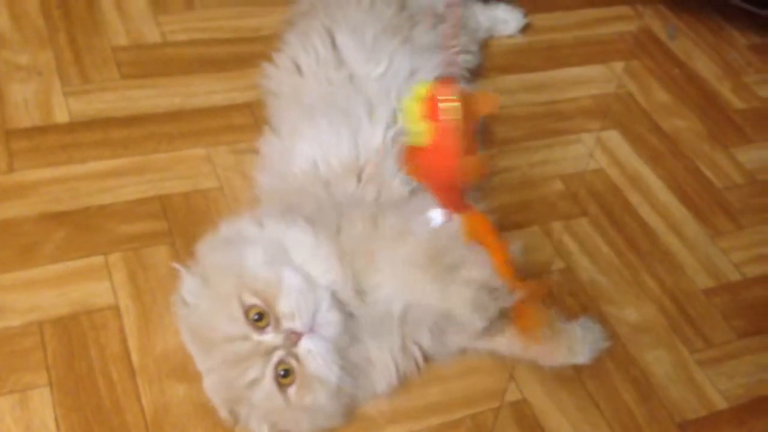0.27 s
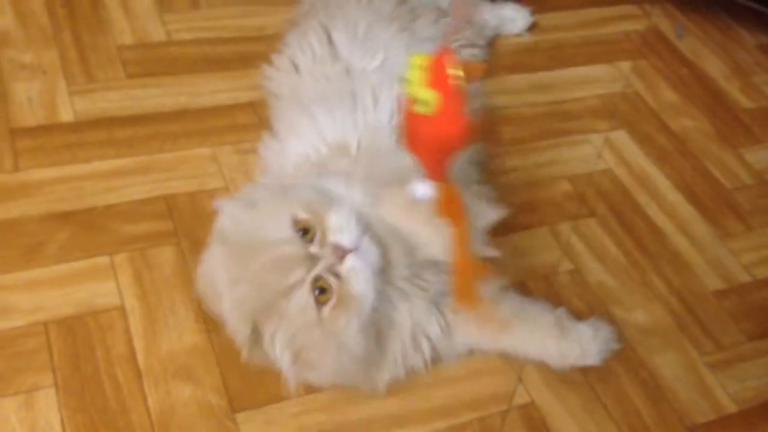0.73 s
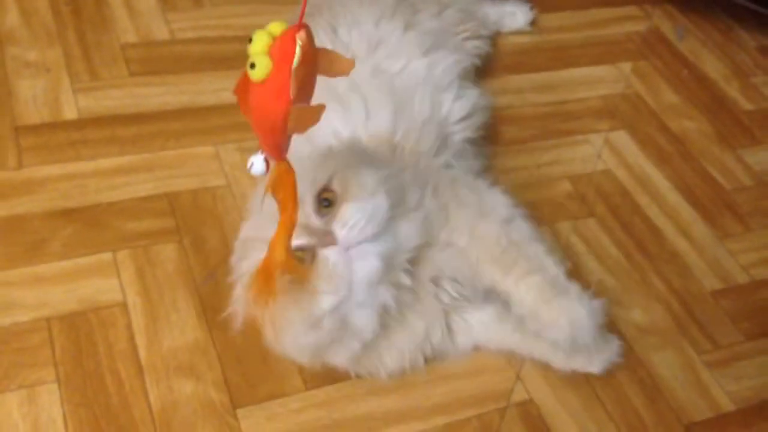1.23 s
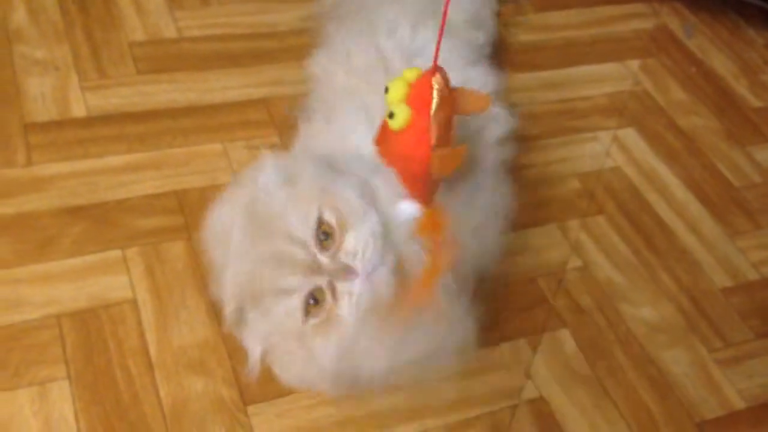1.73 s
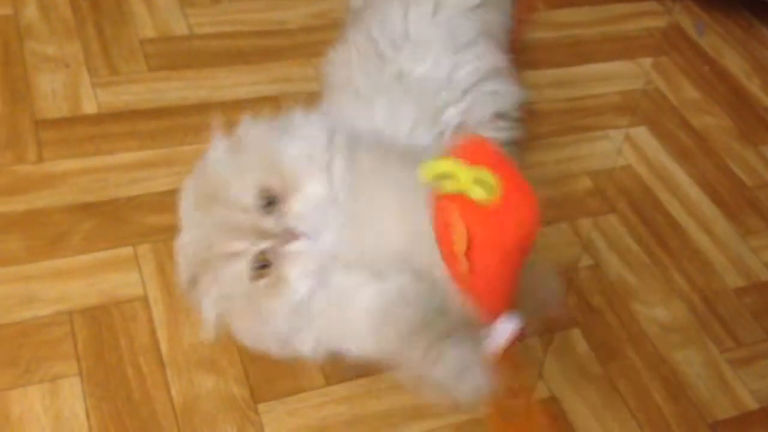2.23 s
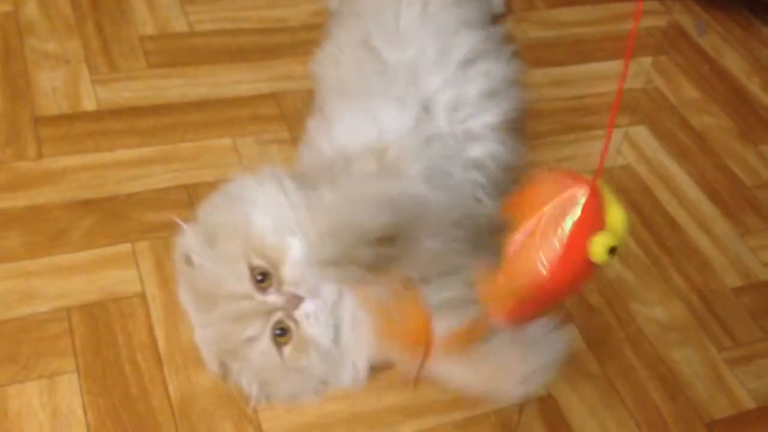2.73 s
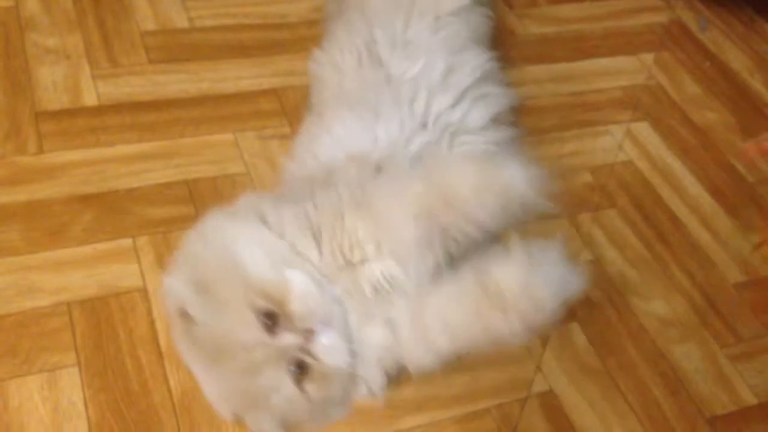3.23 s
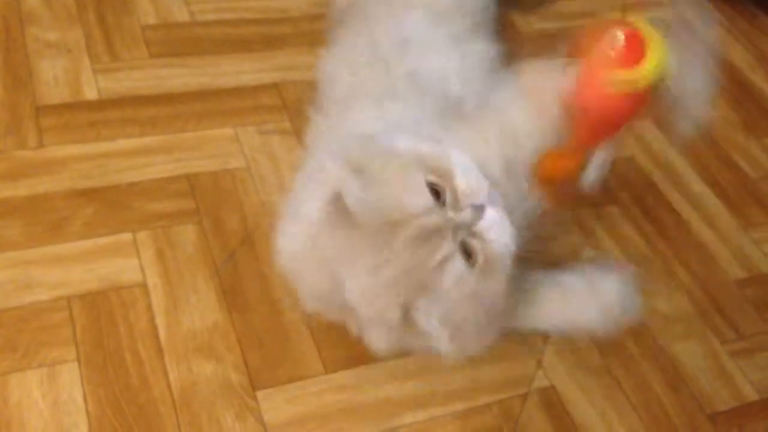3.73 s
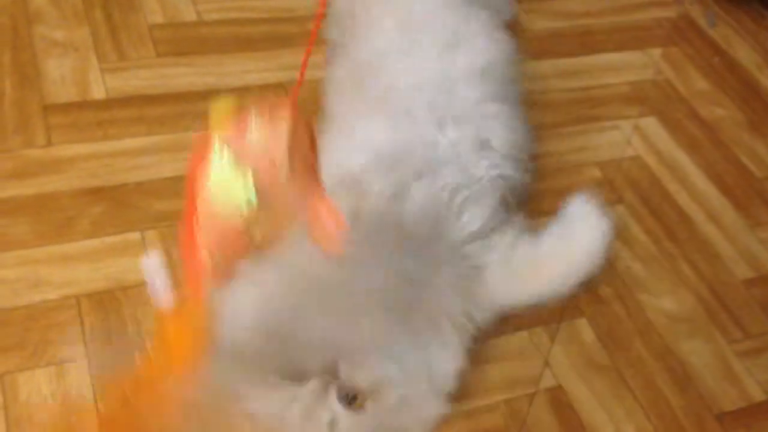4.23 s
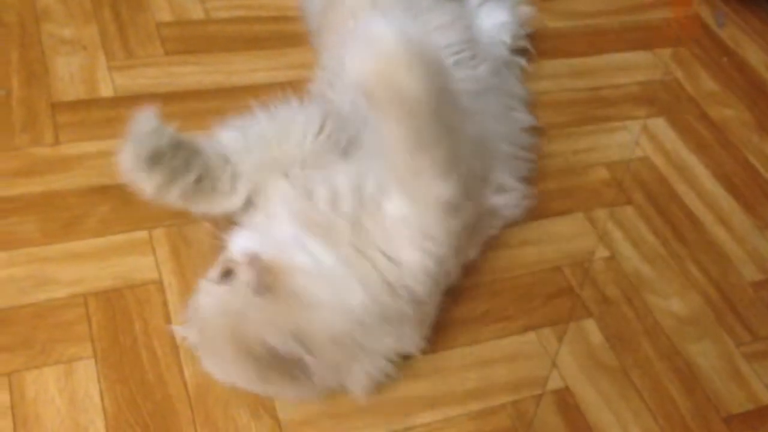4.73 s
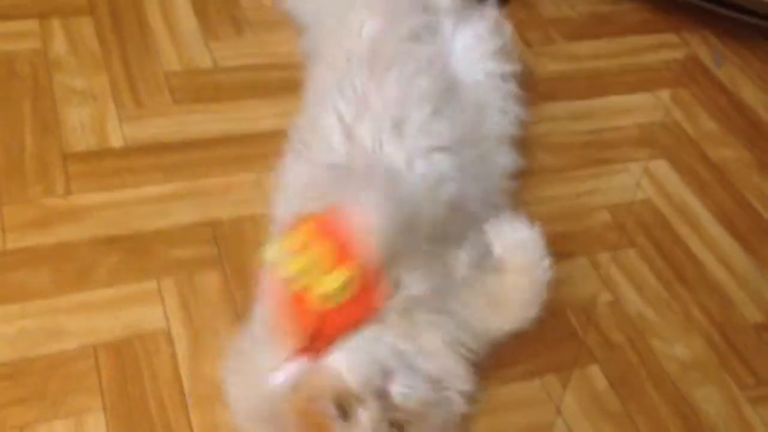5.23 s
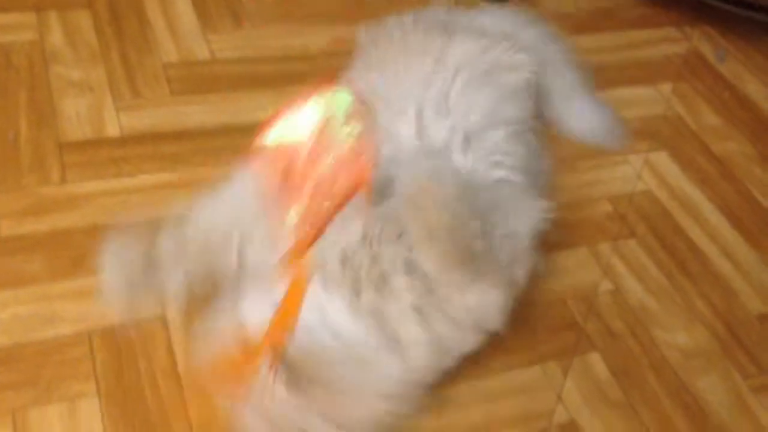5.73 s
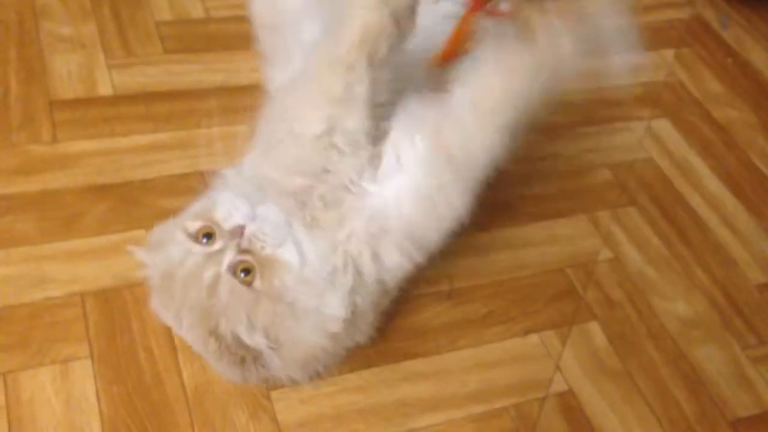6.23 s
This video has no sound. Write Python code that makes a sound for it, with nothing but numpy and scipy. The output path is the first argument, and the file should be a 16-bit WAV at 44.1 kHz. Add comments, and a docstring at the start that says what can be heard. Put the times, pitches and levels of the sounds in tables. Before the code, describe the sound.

A quiet small room with steady soft microphone hiss and a faint low hum. From 0 to 1.4 s there are only light air whisks, a soft body slide near 0.4 and small dull taps at about 0.5, 0.7 and 1.2. At 1.45 claws catch the hollow toy with a short scratch and a sharp bright click. Faint ticks from 1.8 grow into a loud, very high, dry bell jingle at 2.1, rattling until about 2.3, with smaller clusters at 2.6 to 2.7. Another dense jingle comes at 3.15 to 3.3, then a bright burst at 3.8. A firm low wooden thump lands at 3.93, with scuffs, swishes and weaker thuds to 4.3. The bell jingles again at 4.43 to 4.75, a dull knock follows at 4.9, and a short tinkle at 5.27. Soft fur swishes lead to tiny taps, a light thud and slide near 6.25, and a last faint tinkle at 6.4.

```python
"""A tiny slotted bell jingles in clusters while paws scratch, tap and thump on a parquet floor and fur swishes;
microphone hiss lies over a low room hum. A kitten bats at a dangling toy close to a camera in a quiet room.
The bell is decaying shell modes with dry ticks, and dense random contacts as its pellet rolls.
Scratches, rasps and swishes are grainy noise in bands, taps short noise bursts, thumps damped board modes.
Sparse reflections carry all but the thumps, hiss and hum into the room."""
import sys
import numpy as np
from scipy import signal
from scipy.fft import rfft, irfft
from scipy.io import wavfile

SR = 44100
rng = np.random.default_rng(int(sys.argv[2]) if len(sys.argv) > 2 else 0)


def put_to_file(sound):
    """Save the sound as 16-bit audio at rate SR, in the file named by the first command-line argument."""
    columns = np.atleast_2d(sound).T  # one column per channel
    safe = np.clip(columns, -1, 1)
    whole_steps = np.round(safe * 32767)
    wavfile.write(sys.argv[1], SR, whole_steps.astype(np.int16))


def magnitude_from_level(level_db):
    """Linear magnitude for a level in decibels (20 dB per decade)."""
    exponent = np.asarray(level_db, float) / 20
    return 10 ** exponent


N = 285327  # length in samples


def evened(x):
    """Normalisation of power: scales to rms 1."""
    return x / np.sqrt(np.mean(x ** 2) + 1e-20)


def read(points, hz):
    """Interpolation along a logarithmic frequency axis, between the points of a table."""
    f, value = np.transpose(points)
    return np.interp(np.log(hz + 1), np.log(f + 1), value)


def add(mix, s, sound):
    """Superposition: adds a sound to the mix in place, from time s."""
    part = mix[round(s * SR):][:len(sound)]
    part += sound[:len(part)]


def fade(t, t60):
    """Exponential decay: falls 60 dB in t60 seconds."""
    return magnitude_from_level(-60 * t / t60)


def band(x, hz, width_hz):
    """Resonant filtering: a bell-shaped band around hz, thinned far below it, at rms 1."""
    f = np.fft.rfftfreq(len(x), 1 / SR)
    thin_below = f ** 2 / (f ** 2 + (0.15 * hz) ** 2)
    bell_shape = 1 / (1 + ((f - hz) / (width_hz / 2)) ** 2)
    return evened(irfft(rfft(x) * thin_below * bell_shape, len(x)))


def background():
    """Stationary noise: smooth microphone hiss, and narrow noise bands heard as wavering drones of the house."""
    # hiss spectrum, relative: hz, density_db (per Hz)
    hiss_colour = [(12, -63), (20, -44), (38, -8.5), (112, -1.5), (189, -4.5), (218, -8), (295, -12),
                   (401, -15), (544, -13), (974, -19.5), (1180, -19.5), (2120, -21), (4120, -20),
                   (15200, -23)]
    # drones: centre_hz, width_hz, level_db
    drones = [(53.4, 10, -76.5), (117, 33, -82), (190.2, 11, -80.5), (284.5, 24, -82), (515.4, 68, -78)]
    f = np.fft.rfftfreq(N, 1 / SR)
    coloured = irfft(rfft(rng.standard_normal(N)) * magnitude_from_level(read(hiss_colour, f)), N)
    out = magnitude_from_level(-64) * evened(coloured)
    for hz, width_hz, db in drones:
        out += magnitude_from_level(db) * band(rng.standard_normal(N), hz, width_hz)
    return out


def room(x):
    """Reverberation: sparse reflections of random sign, each frequency band decaying at its own rate."""
    # decay of the room: hz, t60_s
    room_decay = [(300, 0.55), (2000, 0.27), (8000, 0.26), (15000, 0.074)]
    reverb_db, spacing = -12, 20  # spacing in samples
    hits = np.zeros(SR // 2)
    slots = np.arange(160, len(hits) - spacing, spacing)
    hits[slots + rng.integers(0, spacing, len(slots))] = rng.choice([-1., 1.], len(slots))
    hz, t, spectrum = signal.stft(hits, SR, nperseg=256)
    decay = fade(t, read(room_decay, hz)[:, None])
    tail = signal.istft(spectrum * decay, SR, nperseg=256)[1]
    return magnitude_from_level(reverb_db) * signal.fftconvolve(x, tail / np.linalg.norm(tail))[:N]


def thumps():
    """Modal excitation: a soft push rings the low modes of the boards until the weight settles on them."""
    # body and paws landing: start_s, level_db, pitch_factor, choke_s (time until the weight damps the ring)
    landings = [(3.932, -18.5, 0.96, 0.032), (3.978, -34.5, 0.94, 0.026), (4.021, -47, .9, 0.092),
                (4.081, -44.5, 0.886, 0.047), (4.272, -41, 0.78, 0.023), (4.312, -41.5, 0.46, 0.072),
                (6.23, -46, 0.7, 0.033), (6.254, -40.5, 0.39, 0.035)]
    # board modes before the pitch factor: mode_hz, relative_db, t60_s
    board_modes = [(191, 0, 0.14), (308, -10.5, 0.056), (436, -18, 0.053), (674, -36.5, 0.052)]
    rise_s, choke_t60_s = 0.0047, 0.03
    out, t = np.zeros(N), np.arange(8192) / SR
    bent = t + 0.0015 * (1 - np.exp(-t / 0.0023))  # the loaded board starts stiffer, so the pitch sags
    push = np.sin(np.pi / 2 * np.minimum(t / rise_s, 1)) ** 2
    for s, db, pitch, choke in landings:
        ring = np.zeros(len(t))
        for hz, mode_db, t60 in board_modes:
            ring += magnitude_from_level(mode_db) * np.sin(2 * np.pi * hz * pitch * bent) * fade(t, t60)
        choked = fade(np.maximum(t - choke, 0), choke_t60_s)
        add(out, s, -magnitude_from_level(db) * ring * push * choked)
    # boards radiate little deep bass
    return signal.sosfilt(signal.butter(3, 120, "high", fs=SR, output="sos"), out)


def grainy_strokes(table, edge, grain_db, colour=None):
    """Amplitude-modulated noise: grains of uneven size under a stroke, in the row's band or a shared colour."""
    out, size = np.zeros(N), (len(table), SR // 2)
    grains = rng.standard_normal(size) * magnitude_from_level(grain_db * np.minimum(rng.exponential(1, size), 4))
    for (s, length, db, *own), grain in zip(table, grains):
        stroke = signal.windows.tukey(round(length * SR), edge)  # edge: share of the stroke spent fading
        heard = np.zeros(len(grain))
        for hz, width_hz, part_db in colour or [(*own, 0)]:
            heard += magnitude_from_level(part_db) * band(grain, hz, width_hz)
        add(out, s, magnitude_from_level(db) * evened(heard[:len(stroke)]) * stroke)
    return out


def whisks():
    """Broadband air noise: the toy's tail whisks through the air."""
    # strokes: start_s, length_s, level_db
    tail_strokes = [(0, 0.05, -64.5), (.85, 0.15, -64)]
    # their colour: centre_hz, width_hz, relative_db
    air_colour = [(3380, 5700, 1.5), (10150, 640, -5), (10200, 4000, -6.5)]
    return grainy_strokes(tail_strokes, edge=0.33, grain_db=4.0, colour=air_colour)


def slides():
    """Sliding friction: the body drags over the boards, heard through three shared bands."""
    # strokes: start_s, length_s, level_db
    body_strokes = [(.42, 0.22, -63), (6.27, 0.079, -65)]
    # their colour: centre_hz, width_hz, relative_db
    slide_colour = [(330, 120, -3), (605, 310, -1.5), (1800, 1500, -2)]
    return grainy_strokes(body_strokes, edge=0.53, grain_db=5, colour=slide_colour)


def swishes():
    """Soft band noise with long fades: fur and cloth brushing past, and a 6.5 kHz hiss under the bell's jingling."""
    # soft noises: start_s, length_s, level_db, centre_hz, width_hz
    soft_noises = [(.25, 0.29, -68, 186, 199), (0.55, 0.16, -69, 12900, 4000),
                   (3.93, 0.17, -67, 3700, 8700), (3.98, 0.055, -63.5, 1040, 600),
                   (4.205, 0.038, -68, 1230, 440), (4.105, 0.021, -63.5, 1080, 660),
                   (4.8, .07, -73.5, 750, 140), (3.95, 0.046, -53.5, 314, 130),
                   (3.98, 0.064, -63.5, 11800, 5000), (4.1, 0.041, -60, 5100, 7600),
                   (4.205, 0.04, -57, 6800, 5200), (4.55, 0.14, -67, 185, 88),
                   (4.86, .13, -64.5, 6700, 11000), (5.55, 0.45, -72, 8300, 8700),
                   (5.875, 0.045, -70, 2050, 400), (5.995, 0.028, -70, 1760, 560),
                   (5.98, 0.13, -63, 12400, 7800), (6, 0.16, -66, 8900, 8300),
                   (3.15, 0.11, -57, 6540, 4000)]
    return grainy_strokes(soft_noises, edge=0.49, grain_db=3.5)


def scratches():
    """Rough, short grainy bursts: friction of claw drags, and a 6.3 kHz rasp within the bell's jingle."""
    # bursts: start_s, length_s, level_db, centre_hz, width_hz
    rough_bursts = [(1.464, .016, -62, 2200, 900), (1.482, 0.042, -69, 9700, 6060),
                    (2.075, 0.022, -48, 6100, 5000), (4.002, 0.012, -55.5, 2520, 2000),
                    (4.013, 0.0097, -55.5, 3500, 5000), (4.028, 0.0061, -58.5, 3000, 4000),
                    (3.804, 0.0074, -48, 6300, 1200)]
    return grainy_strokes(rough_bursts, edge=0.079, grain_db=7.0)


def catches():
    """Cavity resonance: claws catch the hollow toy, and their friction is heard through its resonances."""
    # strokes: start_s, length_s, level_db
    claw_catches = [(1.442, .022, -50.5), (2.075, 0.0194, -52)]
    # resonances of the toy: centre_hz, width_hz, relative_db
    toy_colour = [(610, 280, -9.5), (1013, 170, -4), (1483, 120, -0.5), (2220, 340, 0.5), (3800, 1800, -2)]
    return grainy_strokes(claw_catches, edge=0.069, grain_db=1.5, colour=toy_colour)


def taps():
    """Impact noise: claw and toy taps are short dull clicks, noise bands that decay without a ring."""
    # taps: start_s, level_db (at the onset), centre_hz, width_hz, t60_s
    tap_rows = [(3.797, -49.5, 4000, 6000, .005), (0.48, -58, 3000, 3000, 0.0088),
                (.546, -46.5, 2500, 3020, 0.0089), (0.723, -54, 1990, 5000, 0.017),
                (1.2, -54, 1490, 2500, 0.014), (1.4813, -30.5, 10800, 5000, 0.0052),
                (1.798, -51, 1800, 2960, 0.023), (1.799, -46, 11900, 5000, 0.0067),
                (2.075, -36.5, 5300, 6140, 0.021), (3.147, -50, 4040, 5000, .006),
                (4.047, -54, 3000, 4000, 0.0083), (4.069, -54, 2400, 3000, 0.012),
                (4.075, -54, 2950, 5000, 0.0086), (4.09, -48.5, 2360, 3000, 0.0087),
                (6.155, -57, 2500, 3000, .008), (6.297, -57, 2500, 3000, .01), (6.31, -58, 2500, 3000, .01),
                (4.915, -49, 586, 696, 0.031), (1.4813, -43.5, 3000, 5000, 0.0091)]
    out, t = np.zeros(N), np.arange(1024) / SR
    for s, db, hz, width_hz, t60 in tap_rows:
        noise = rng.standard_normal(len(t))
        add(out, s, magnitude_from_level(db) * band(noise, hz, width_hz) * fade(t, t60))
    return out


def strikes(table):
    """Modal synthesis: each contact excites three rings of shell modes and a dry tick that bounces once."""
    # shell modes in three clusters, the low, middle and top ring; each: mode_hz, relative_db, t60_s (early decay)
    shell_rings = [
        [(12130, 0, .013), (11780, -11, .009), (12450, -12, .011)],
        [(13350, 0, .013), (13740, -11, .011), (12950, -13, .011)],
        [(14800, 0, .011), (14350, -8, .01), (15100, -8, .01)],
    ]
    # colour of the tick, with the air in the shell near 6.5 kHz: hz, relative_db
    tick_colour = [(500, -50), (1500, -18.5), (2500, -9.5), (4000, -4), (5800, -3), (6500, 2.5),
                   (7200, -1.5), (11000, -2.5), (16000, -1.5), (20000, -42)]
    after_db, after_t60_s = -25, 0.055  # what sings on once the pellet lets go
    bounce_s, bounce_db = 0.0014, -1.5  # mean delay, and middle level relative to the tick
    t, lead = np.arange(4096) / SR, 64  # lead: samples of room ahead of the contact
    colour = magnitude_from_level(read(tick_colour, np.fft.rfftfreq(len(t), 1 / SR)))
    place = rng.standard_normal((len(table), 3, 3, 2))
    bounce, grit = rng.standard_normal((len(table), 2)), rng.standard_normal((len(table), len(t)))
    for (*ring_db, tick_db), p, b, g in zip(table, place, bounce, grit):
        ring = np.zeros(len(t))
        for db, modes, chance in zip(ring_db, shell_rings, p):
            for k, ((hz, mode_db, t60), (detune, share)) in enumerate(zip(modes, chance)):
                decay = fade(t, t60) + magnitude_from_level(after_db) * fade(t, after_t60_s)
                weight = magnitude_from_level(db + mode_db) * (share if k else 1)  # where it lands sets the side modes
                ring += weight * np.sin(2 * np.pi * hz * (1 + 0.0034 * detune) * t) * decay
        ring *= 1 - np.exp(-t / 0.00018)  # soft onset
        contact = (t == 0) + g * (0.36 * fade(t, 0.0014) + 0.065 * fade(t, 0.06))
        tick = irfft(rfft(np.roll(contact, lead)) * colour, len(t))
        tick *= magnitude_from_level(tick_db) / abs(tick).max()
        delay = round(SR * bounce_s * (1 + 0.15 * b[0]))
        again = np.roll(tick, delay) * magnitude_from_level(bounce_db + 3.9 * b[1])
        yield np.roll(np.roll(ring, lead) + tick + again, -lead)[:-lead]


def clear_strikes():
    """Isolated impacts: the pellet strikes the shell in clusters, each with its own balance of rings and tick."""
    # strikes: start_s, low_ring_db, middle_ring_db, tick_db (peak)
    strike_rows = [(0.7613, -59, -54, -75), (1.8339, -51, -60, -46.5), (1.8529, -52, -71, -48),
                   (1.9086, -60, -40, -34.5), (1.921, -50, -51, -38), (1.93, -42, -53, -36),
                   (1.942, -39, -31, -37), (2.024, -50, -57, -46), (2.036, -46, -57, -43),
                   (2.0957, -23.5, -25, -26), (2.0967, -29, -30, -26), (2.104, -26, -39, -41),
                   (2.113, -24.5, -29, -31.5), (2.1327, -40, -41, -41), (2.1488, -32, -39, -30.5),
                   (2.166, -35, -39, -37), (2.181, -29.5, -33, -32), (2.208, -38, -51, -37),
                   (2.226, -44, -57, -35), (2.247, -54, -49, -48), (2.2613, -29.5, -32, -38),
                   (2.2708, -39, -60, -41), (2.2804, -53, -62, -39.5), (2.463, -53, -62, -48.5),
                   (2.559, -60, -65, -48), (2.5919, -47, -59, -38), (2.5975, -58, -41, -36),
                   (2.6048, -60, -48, -33.5), (2.651, -39, -50, -35), (2.6572, -55, -40, -37.5),
                   (2.662, -35, -42, -38.5), (2.668, -45, -57, -36), (2.701, -26.5, -20.5, -32),
                   (2.71, -46, -60, -38), (3.1592, -53, -49, -43), (3.1722, -54, -60, -32.5),
                   (3.1752, -49, -41, -43), (3.18, -43, -46, -35), (3.208, -43, -46, -32),
                   (3.22, -25, -42, -32), (3.2342, -30, -43, -30), (3.2524, -35, -40, -43),
                   (3.26, -33, -45, -40), (3.2925, -57, -64, -47), (3.415, -41, -53, -39.5),
                   (3.423, -45, -51, -47), (3.6059, -57, -71, -65), (3.8015, -32, -54, -32.5),
                   (3.8165, -55, -46, -42), (3.831, -26, -40, -33), (3.8365, -29, -24, -36),
                   (3.8411, -25, -60, -29.5), (4.4256, -38, -26, -30.5), (4.437, -32, -54, -35),
                   (4.4417, -42, -49, -33.5), (4.459, -18.5, -41, -29.5), (4.4766, -32, -42, -36),
                   (4.4817, -60, -38, -35), (4.506, -56, -47, -36.5), (4.5278, -53, -58, -44),
                   (4.538, -62, -46, -42), (4.56, -52, -66, -48), (4.5698, -57, -70, -50),
                   (4.6429, -56, -70, -60), (4.6853, -41, -52, -44), (4.6937, -39, -57, -48),
                   (4.7206, -43, -60, -56), (4.7288, -46, -53, -46), (5.015, -57, -65, -44.5),
                   (5.2504, -47, -70, -49), (5.2718, -29, -56, -36), (5.2846, -36, -70, -42),
                   (5.3, -43, -66, -43), (5.6407, -57, -69, -47.5), (6.187, -55, -59, -45),
                   (6.207, -52, -63, -45), (6.412, -38, -51, -36), (6.43, -53, -55, -42)]
    top_ring_db = -21  # relative to the stronger of the other two rings
    out = np.zeros(N)
    levels = [(low, middle, max(low, middle) + top_ring_db, tick) for _, low, middle, tick in strike_rows]
    for (s, *_), sound in zip(strike_rows, strikes(levels)):
        add(out, s, sound)
    return out


def rolling():
    """Shot noise: a shower of tiny random contacts as the pellet rolls round the shell after a jolt."""
    # rolls: start_s, build_up_s, level_db (the peak rms comes out 1.2 dB above it), t60_s
    roll_rows = [(1.9, .03, -53.5, 0.3), (2.095, .003, -52, 0.23), (2.15, 0.036, -49.5, 0.21),
                 (2.26, .01, -59, 0.13), (2.592, .002, -54, 0.13), (2.65, 0.015, -53, 0.065),
                 (2.7, .005, -56, 0.11), (3.15, 0.033, -48.5, 0.29), (3.2, 0.047, -47.5, 0.12),
                 (3.403, .006, -60, .2), (3.8, .003, -54, .12), (3.825, 0.012, -43, 0.13),
                 (4.425, .005, -55, 0.34), (4.455, .012, -50, 0.23), (4.685, .003, -48, 0.041),
                 (4.715, 0.0084, -55.5, 0.092), (5.272, .003, -53, 0.13), (6.41, .003, -59, 0.21)]
    # balance of one contact, relative: low_ring_db, middle_ring_db, top_ring_db, tick_db
    roll_mix = [0, -3, -17, -5]
    contacts_per_s = 1100
    kinds = list(strikes([roll_mix] * 8))  # eight variants to draw from
    happens = rng.random(N) < contacts_per_s / SR
    size = magnitude_from_level(3.5 * np.minimum(rng.exponential(1, N), 4)) * happens
    kind = rng.integers(0, len(kinds), N)

    def shower(gain):
        """Convolution: places every contact's sound at its moment and strength."""
        return sum(signal.oaconvolve(gain * size * (kind == k), v)[:N] for k, v in enumerate(kinds))

    level, t = np.zeros(N), np.arange(SR // 2) / SR
    for s, build, db, t60 in roll_rows:
        add(level, s, magnitude_from_level(db) * np.minimum(t / build, 1) * fade(np.maximum(t - build, 0), t60))
    return shower(level) / np.std(shower(0.87))


def bell():
    """Impact excitation of a shell: clear strikes, and the shower of the rolling pellet."""
    return clear_strikes() + rolling()


def scene():
    """Direct and reverberant field: bell, paws and fur in the room, with thumps and background added dry."""
    rough = scratches() + catches()
    soft = swishes() + slides() + whisks()
    near = bell() + taps() + rough + soft
    return (near + room(near) + thumps() + background())[None]


def low_pass(x):
    """Removes everything above the highest recorded frequency."""
    return signal.sosfilt(signal.butter(12, 16500, fs=SR, output="sos"), x)


def record(dry):
    """Band limiting: the recorder's upper band edge removes the highest treble."""
    # band edge: hz, gain_db
    band_edge = [(15250, 0), (15500, -24), (16500, -26), (22050, -60)]
    gain = magnitude_from_level(read(band_edge, np.fft.rfftfreq(N, 1 / SR)))
    mix = irfft(rfft(dry) * gain, N)
    return low_pass(mix)


dry = scene()
out = record(dry)
put_to_file(out)
```